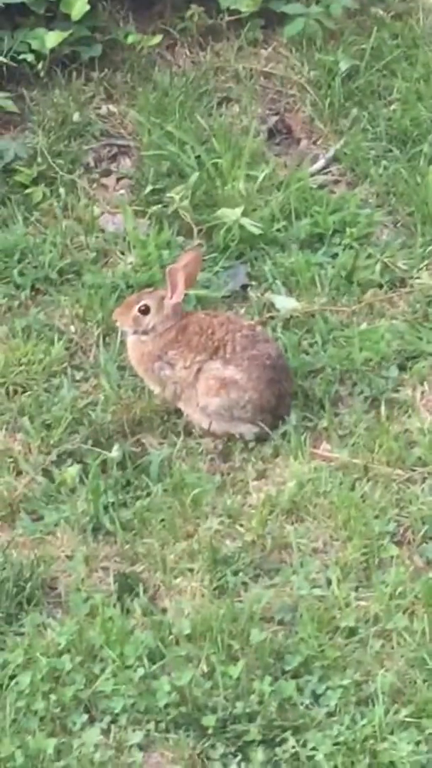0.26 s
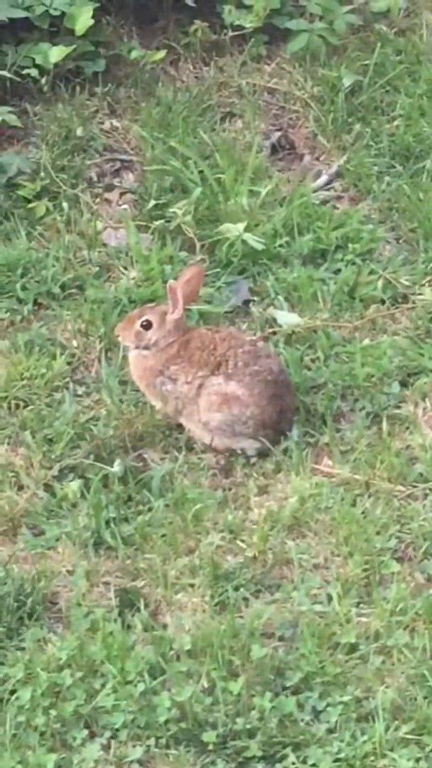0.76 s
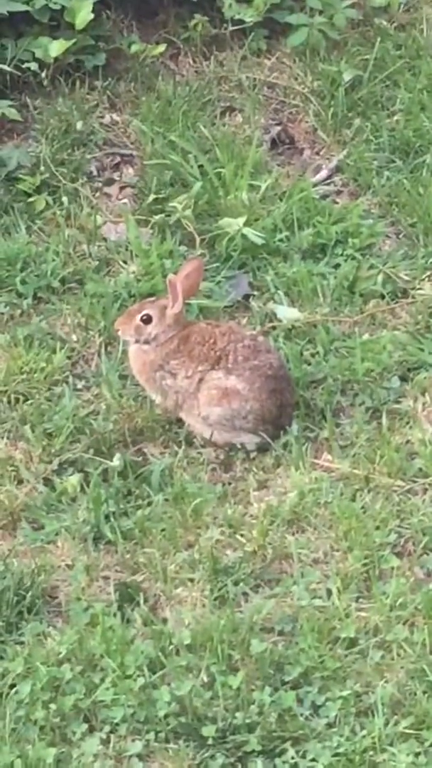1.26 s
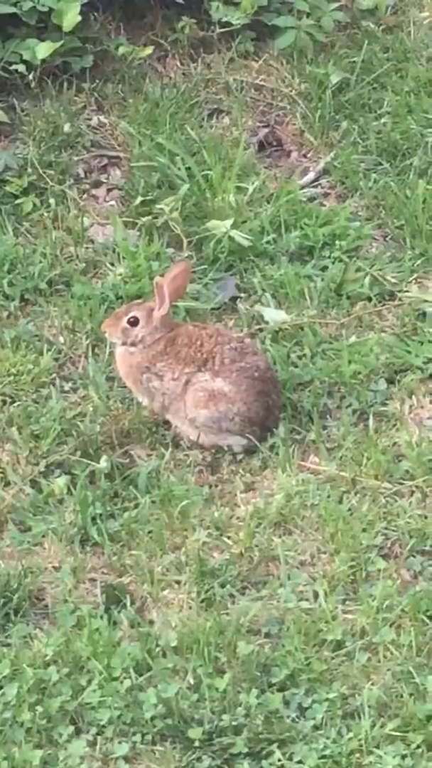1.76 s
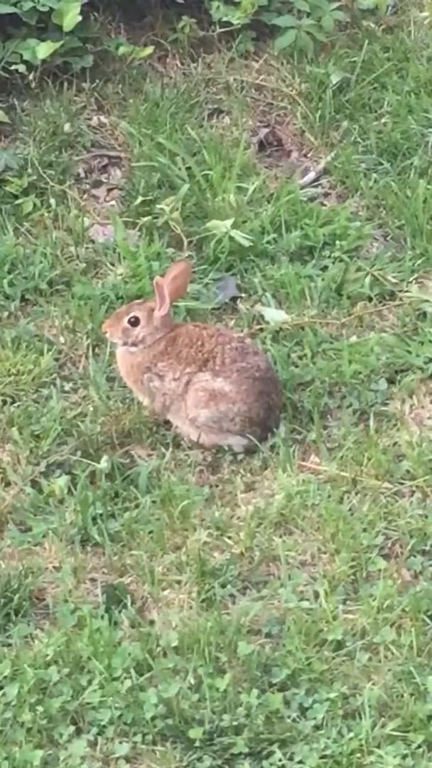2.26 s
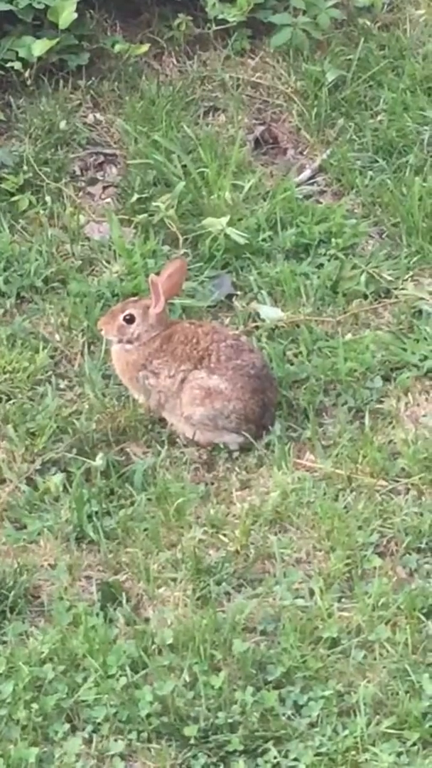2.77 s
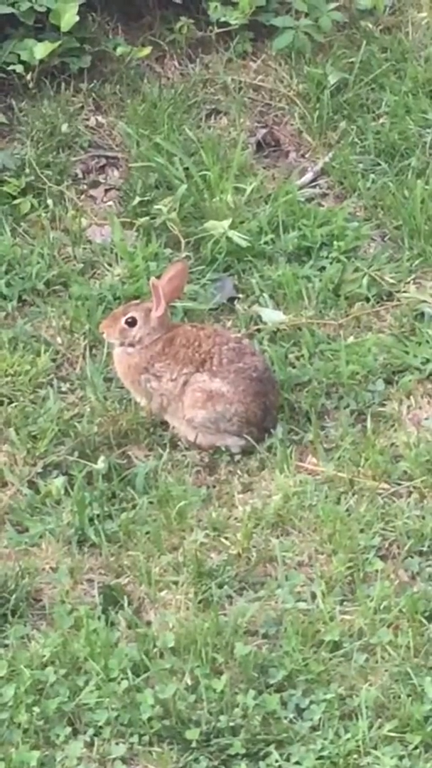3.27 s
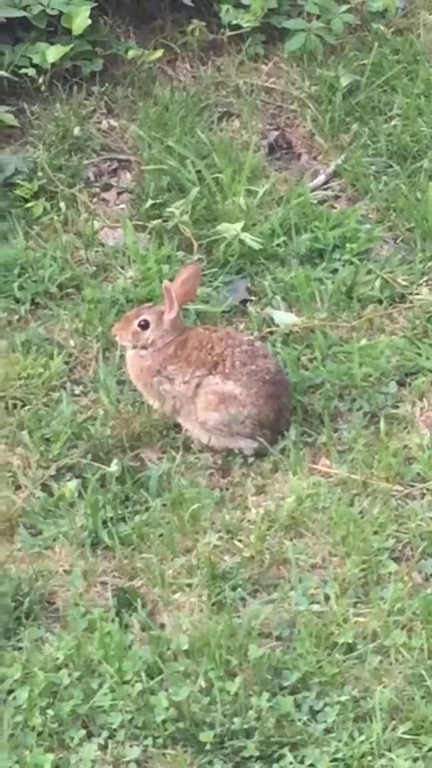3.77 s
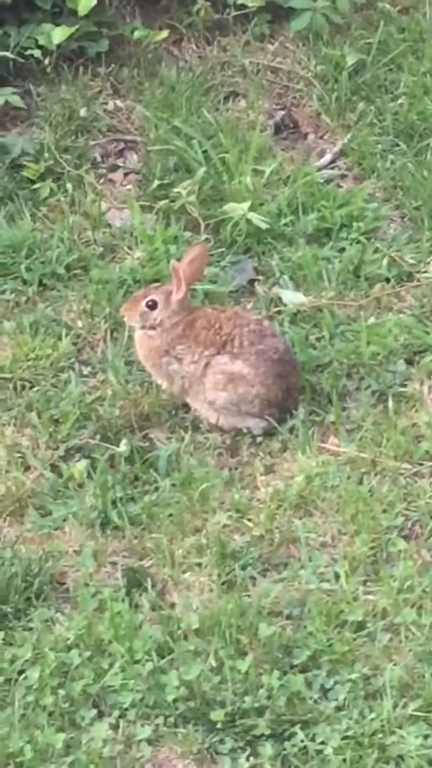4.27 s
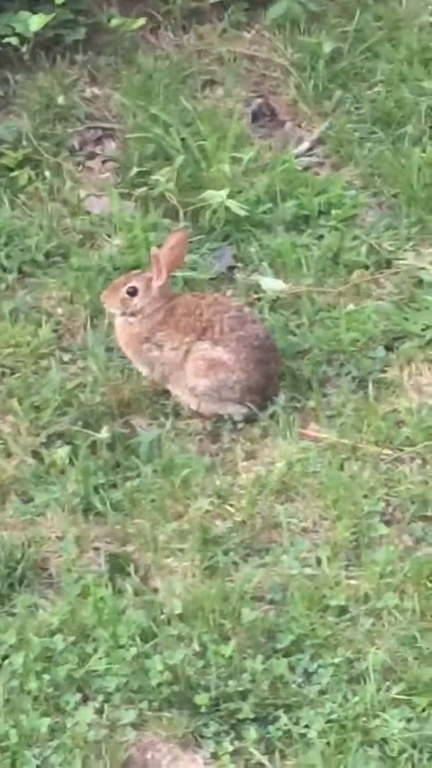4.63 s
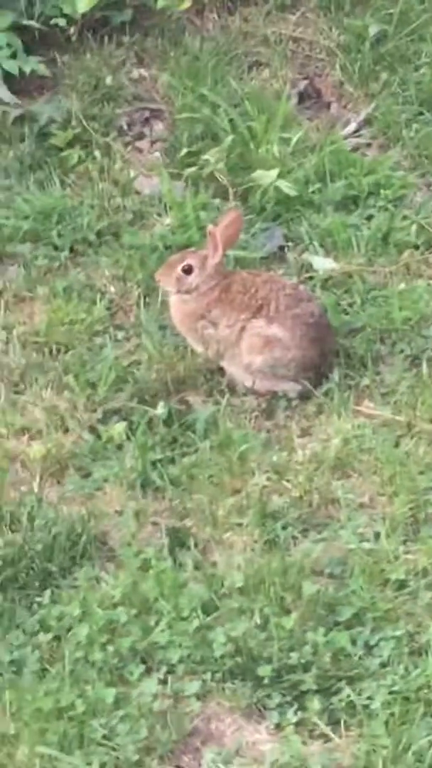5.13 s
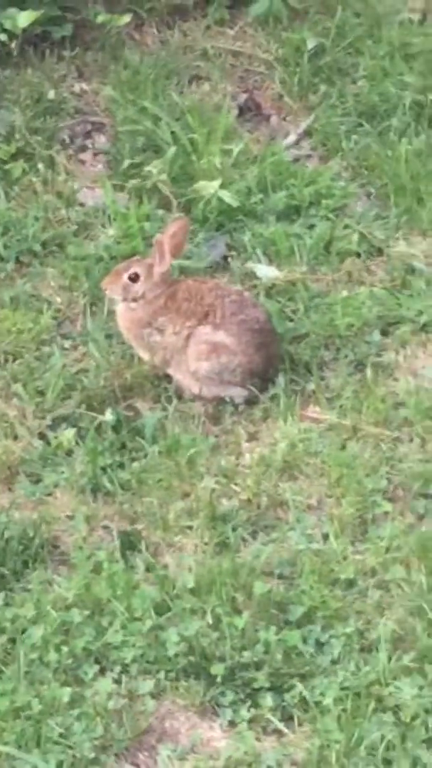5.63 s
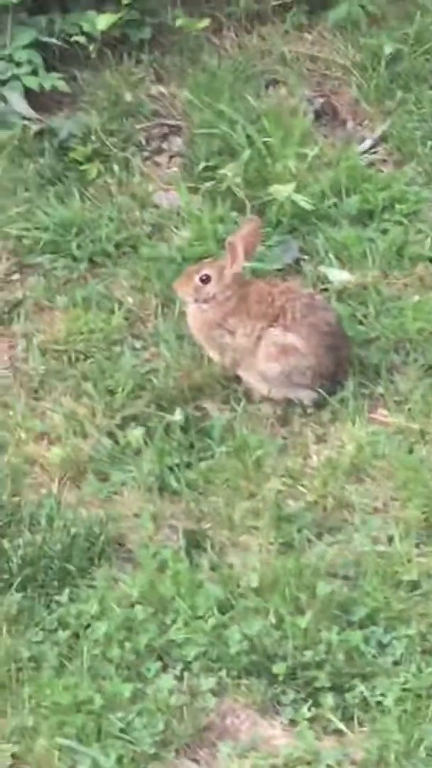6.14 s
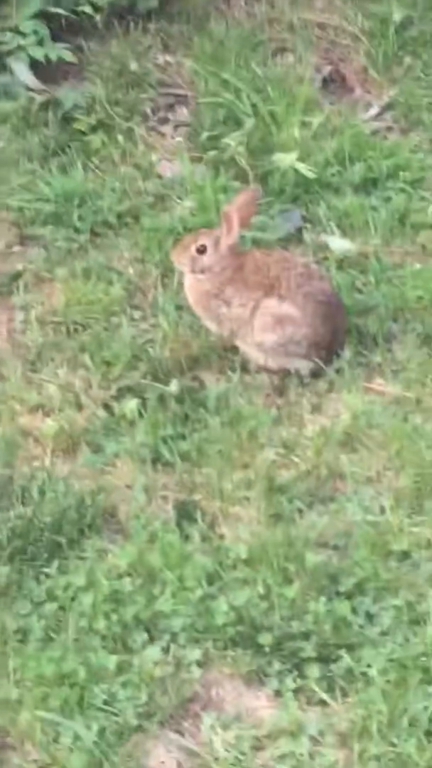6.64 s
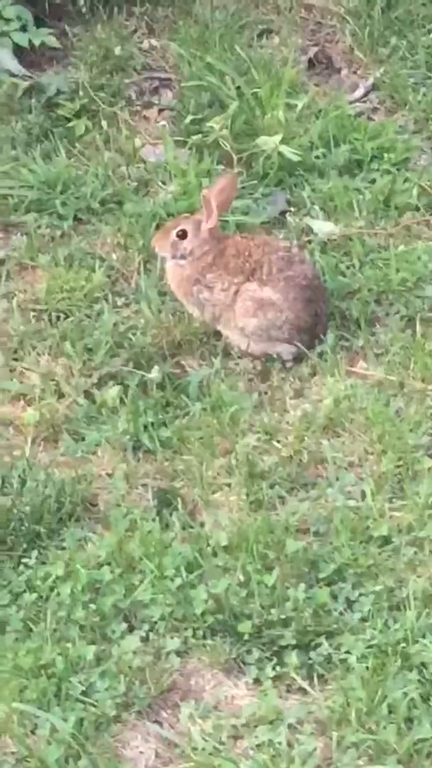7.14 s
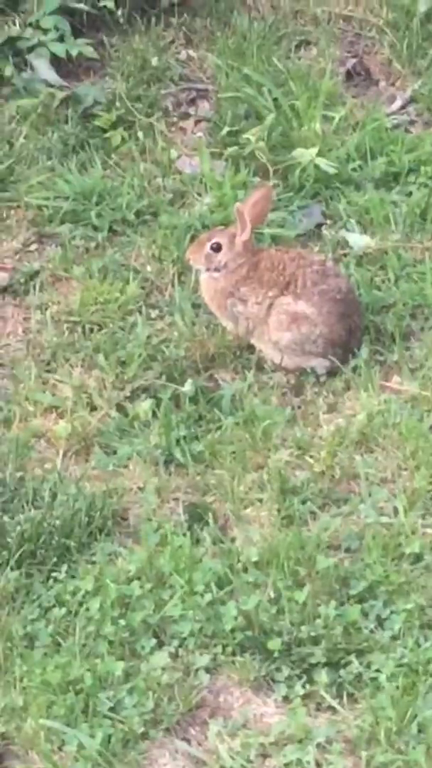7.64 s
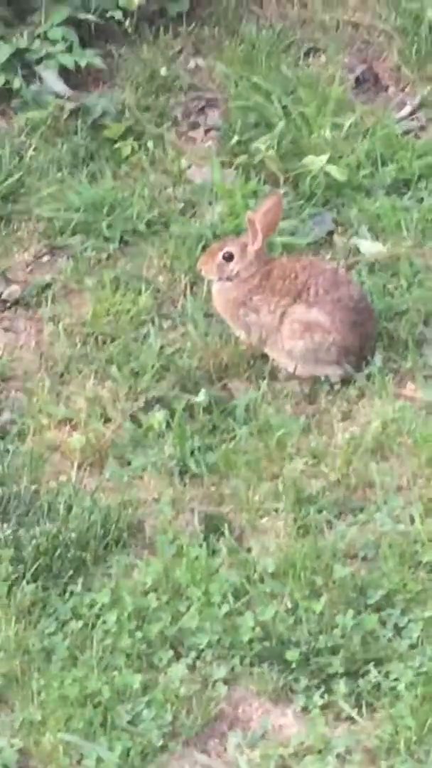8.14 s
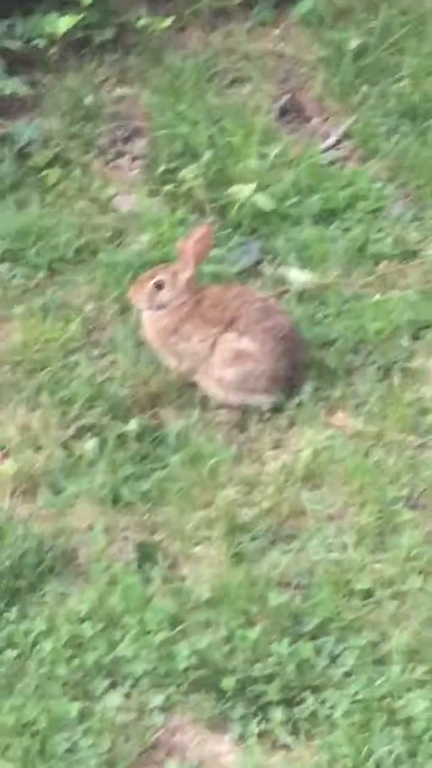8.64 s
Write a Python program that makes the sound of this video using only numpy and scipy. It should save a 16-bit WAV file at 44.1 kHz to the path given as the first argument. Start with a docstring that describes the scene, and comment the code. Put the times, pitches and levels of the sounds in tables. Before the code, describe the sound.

Outdoors on a summer lawn, cicadas buzz continuously, bright and finely rattling, with faint cricket notes beneath. Distant birds give thin, slightly hoarse falling whistles, crowded in the first three seconds, sparser, then busy again from about five to seven. A deep soft rumble sits underneath and sometimes drops suddenly. A few tiny rustles pass near the single microphone; the rabbit itself is silent.

```python
"""A lawn in summer, heard from one microphone among trees. Distant birds trade thin, falling cries: harmonics
of a sagging pitch, with a noise tail for the garden's echo. Cicadas buzz steadily: the nearest as rows of
falling chirps, those farther off as click-gated noise. Far crickets hold narrow notes of noise. A few soft
rustles pass close by. Filtered noise makes the low rumble, abruptly eased at times as if by a recorder's
wind suppression, the tyres of far traffic and the open air."""
import sys
import numpy as np
from scipy import signal
from scipy.fft import rfft, irfft, next_fast_len
from scipy.io import wavfile
from scipy.ndimage import uniform_filter1d

SR = 44100
rng = np.random.default_rng(int(sys.argv[2]) if len(sys.argv) > 2 else 0)


def output_pcm(signal):
    """Save a mono or channel-first signal as 16-bit PCM at the path in sys.argv[1].

    Samples are clipped to [-1, 1] before scaling.
    """
    pcm = np.clip(np.atleast_2d(signal).T, -1, 1) * 32767
    wavfile.write(sys.argv[1], SR, np.round(pcm).astype(np.int16))


N = 392490
TIME = np.arange(N) / SR

# distant bird cries, whistle level before flutter and garden: start_s, length_s, crest_hz, sag_hz_per_s,
# whistle_db, lower_partials_db (re whistle), hoarseness (0-1)
BIRD_CRIES = [ (.01, .13, 3370, 1000, -69.5, -22, 0.6), (0.121, 0.15, 3550, 600, -65.5, -12, .4),
              (.31, 0.27, 3420, 880, -60, -25, 0.3), (.45, .23, 3660, 1600, -53, -20, 0),
              (0.531, .34, 3433, 1192, -54, -24, 0.42), (0.932, 0.29, 3404, 1314, -59, -23, 0.3),
              (1.10, 0.37, 3614, 1600, -56.5, -23, 0.2), (1.309, 0.26, 3547, 1797, -54.5, -23, 0.3),
              (1.657, 0.083, 3440, 597, -60, -15, .4), (1.726, 0.23, 3400, 1850, -52, -24.5, 0.17),
              (1.974, 0.2, 3674, 247, -56.5, -21.5, .03), (2.121, 0.32, 3480, 1295, -51.5, -26, 0.18),
              (2.419, 0.23, 3374, 1275, -61, -19, 0.54), (2.566, 0.21, 3623, 1005, -58, -14, 0.36),
              (2.629, 0.22, 3260, 1000, -60.5, -21, 0.36), (2.949, 0.15, 3320, 2000, -61.5, -23, 0.17),
              (3.379, 0.26, 3540, 597, -68, -10, .2), (3.599, 0.13, 3460, 500, -59, -20, 0.43),
              (4.456, 0.16, 3420, 200, -67, -15, 0.34), (4.531, 0.19, 3365, 1890, -62, -27, 0.2),
              (4.873, .32, 3467, 1200, -55, -34, .18), (4.915, 0.35, 3260, 1200, -59, -19, 0.2),
              (5.249, 0.28, 3510, 588, -65, -18, 0.42), (5.637, 0.32, 3407, 1050, -54.5, -28, .17),
              (5.732, .20, 3590, 1490, -59, -20, 0), (5.938, .28, 3463, 1390, -54, -23, 0.47),
              (5.972, 0.216, 3605, 1604, -55.5, -11.5, 0.18), (6.186, .33, 3155, 648, -60, -27, 0.2),
              (6.519, 0.18, 3434, 1170, -62.5, -18, .8), (6.705, 0.29, 3280, 702, -60, -25, 0.4),
              (6.889, .22, 3090, 1700, -66, -25, .55), (7.008, 0.16, 3587, 1400, -60.5, -10.5, 0.47),
              (7.13, .19, 3406, 1420, -61, -31, .9), (7.986, 0.25, 3410, 1300, -69.5, -24, 0.27),
              (8.783, .32, 3420, 1100, -55.5, -30.5, 0.13), ]
# partials below the whistle: harmonic, level_db (re the cry's lower_partials_db)
LOWER_PARTIALS = [(2, -1), (3, 0.5)]
# faint partials above the whistle: harmonic, level_db (re whistle)
UPPER_PARTIALS = [(5, -24), (10, -26.5)]
# nearest cicadas: strokes_per_s, level_db, stroke_start_hz, stroke_end_hz
NEAR_CICADAS = [(46.18, -58, 7150, 6450), (56.66, -62.5, 7100, 6400)]
# cicadas farther off: clicks_per_s, level_db (within the far chorus), click_decay_s
FAR_CICADAS = [(50.3, -5.5, 0.0059), (172.5, -5.5, 0.0053), (121.2, -6, .003)]
# colour of their ringing abdomens: pitch_hz, relative_db_per_hz
CICADA_BODY = [(4000, -41), (4900, -24.5), (5600, -20), (6000, -12.5), (6250, -1), (6550, 2.5), (7030, 3),
               (7170, -2.5), (7500, -10), (7750, -18.5), (8200, -25.5), (9500, -33.5), (11000, -38)]
# steady notes of far crickets: pitch_hz, width_hz, start_level_db, swell_db_per_s
CRICKET_NOTES = [(4563, 25, -82, 0.55), (5390, 45, -79.5, -0.27), (5610, 60, -77.5, 0.16),
                 (5790, 45, -77, 0), (4170, 170, -81.5, -1)]
# soft rustles near the microphone: centre_s, half_length_s (to 1/e), level_db, centre_hz, width_octaves
RUSTLES = [(3.994, 0.058, -64.5, 1980, 0.86), (5.674, 0.032, -69.5, 13300, 0.86),
           (5.838, 0.044, -75, 13000, 0.53), (5.93, 0.44, -81, 11900, .7), (7.767, .03, -78, 12000, 0.83)]
# level of the low rumble, with its abrupt dips: time_s, level_db
RUMBLE_LEVEL = [(0, -48), (.65, -48.5), (.72, -58.5), (1.2, -53.5), (1.8, -49), (2.6, -50), (3.6, -49),
                (5.2, -47.5), (6.22, -47), (6.36, -52.5), (6.62, -46.5), (7.35, -49), (7.63, -50.5),
                (7.72, -59), (8.17, -53.5), (8.36, -48), (8.48, -54.5), (8.62, -46.5)]
# colour of the rumble: pitch_hz, relative_db_per_hz
RUMBLE_COLOUR = [(20, -46), (32, -23), (42, -13.5), (55, -2.5), (76, 1), (92, -1.5), (110, 0.5),
                 (140, -7.5), (200, -12), (300, -31.5), (500, -69)]
# tyres on a far road: time_s, whine_db, roar_db
TYRE_LEVELS = [(0, -90, -73.5), (1.3, -84, -71.5), (2.7, -83, -65.5), (3.3, -77, -70.5), (4, -88, -65.5),
               (5.8, -74.5, -73), (7.2, -70, -77.5), (7.8, -75.5, -71), (8.9, -80, -78)]
# colour of the tyre roar: pitch_hz, relative_db_per_hz
ROAR_COLOUR = [(120, -4), (260, 2.5), (420, -4), (620, -1), (900, -0.5), (1400, -30.5), (3000, -49)]
# colour of the open air: pitch_hz, relative_db_per_hz
AIR_COLOUR = [(100, 3.5), (280, 6), (450, -4), (630, 0), (1000, 1), (1350, -6), (1800, -9.5), (2200, -12),
              (3400, -17), (4400, -12), (7000, -17.5), (10000, -36), (13500, -24), (16000, -59)]

HOOK_S, HOOK_HZ = 0.052, 249.7  # each cry's rise to its crest: time taken, height
GARDEN_T60_S = 1
THROB_HZ, THROB_CREST_S, THROB_DB = 3.3, 0.2, 0.5  # far chorus: rate, time of a crest, depth either way
TYRE_HZ, TYRE_WIDTH_HZ = 1065, 40  # tread whine
CUTOFF_HZ = 15800


def from_db(db):
    """Decibels to gain."""
    return 10 ** (np.asarray(db) / 20)


def rms_one(x):
    """Scale to unit power."""
    return x / np.sqrt(np.mean(x ** 2) + 1e-20)


def filtered(x, gain_at):
    """Filter by a gain given as a function of frequency; rms 1."""
    size = next_fast_len(N)
    hz = np.maximum(np.arange(size // 2 + 1) * SR / size, 1)
    return rms_one(irfft(rfft(x, size) * gain_at(hz), size)[:N])


def coloured(x, spectrum):
    """Shape a sound by a table of (Hz, dB), interpolated along log frequency; rms 1."""
    points, db = np.transpose(spectrum)
    return filtered(x, lambda hz: from_db(np.interp(np.log(hz), np.log(points), db)))


def white():
    """Fresh white noise."""
    return rng.standard_normal(N)


def drift(rate_hz):
    """Random wandering of rms 1, its gain halved at rate_hz."""
    return filtered(white(), lambda hz: 1 / (1 + (hz / rate_hz) ** 2))


def narrow(centre_hz, width_hz):
    """Noise in one resonance, its gain halved width_hz from the centre; rms 1."""
    return filtered(white(), lambda hz: 1 / (1 + ((hz - centre_hz) / width_hz) ** 2))


def birds(quaver=0.0041, flutter_db=2.5, attack_s=0.042, release_s=0.038, hoarse_width_hz=190,
          rasp_db=-25, rasp_hz=3760, rasp_width_hz=1200):
    """Each cry hooks up to a crest and sags at a steady rate; the throat favours the fourth harmonic."""
    out = np.zeros(N)
    wobble = 1 + quaver * drift(69.0)
    flutter = flutter_db * drift(27)
    # an unsteady membrane spreads every partial into a hoarse band
    unsteady = drift(hoarse_width_hz) + 1j * drift(hoarse_width_hz)
    rasp = from_db(rasp_db) * narrow(rasp_hz, rasp_width_hz)
    for start, length, crest_hz, sag, whistle_db, lower_db, hoarse in BIRD_CRIES:
        span = (TIME > start) & (TIME < start + length)
        t = TIME[span] - start
        hook = HOOK_HZ * np.maximum(1 - t / HOOK_S, 0) ** 2
        whistle_hz = crest_hz - hook - sag * np.maximum(t - HOOK_S, 0)
        phase = 2 * np.pi * np.cumsum(whistle_hz / 4 * wobble[span]) / SR  # of the fundamental
        lower = [(k, db + lower_db) for k, db in LOWER_PARTIALS]
        partials = lower + [(4, 0)] + UPPER_PARTIALS
        tone = sum(from_db(db) * np.exp(1j * k * phase) for k, db in partials)
        # the divisor keeps hoarse and clear cries equally strong
        voice = (tone * (1 + hoarse * unsteady[span])).real / np.sqrt(1 + 2 * hoarse ** 2)
        swell = np.minimum(t / attack_s, 1) * np.minimum((length - t) / release_s, 1)
        out[span] += from_db(whistle_db + flutter[span]) * swell * (voice + rasp[span])
    return out


def garden(x, direct_db=1.5, echo_db=-0.5, build_s=0.023):
    """Trunks, leaves and walls scatter a cry into a diffuse tail."""
    t = TIME[:2 * SR]
    decay = from_db(-60 * t / GARDEN_T60_S)
    tail = rng.standard_normal(len(t)) * decay * (1 - np.exp(-t / build_s))
    echoes = signal.fftconvolve(x, tail / np.linalg.norm(tail))[:N]
    return from_db(direct_db) * x + from_db(echo_db) * echoes


def near_cicadas(waver=0.011, stroke_fade_db=9, blur=0.83, blur_hz=170):
    """Tymbal ribs buckle in turn, each ringing lower, so every stroke is a tiny falling chirp."""
    out = np.zeros(N)
    for rate, level_db, first_hz, last_hz in NEAR_CICADAS:
        stroke = np.cumsum(rate * (1 + waver * drift(2))) / SR % 1  # 0-1 through each stroke
        phase = 2 * np.pi * np.cumsum(first_hz + (last_hz - first_hz) * stroke) / SR
        scatter = 1 + blur * (drift(blur_hz) + 1j * drift(blur_hz))
        swell = np.sqrt(np.abs(np.sin(np.pi * stroke))) * from_db(-stroke_fade_db * stroke)
        out += from_db(level_db) * rms_one(swell * (scatter * np.exp(1j * phase)).real)
    return out


def far_cicadas(level_db=-53.5, hiss_db=-1, waver=0.014):
    """Each tymbal buckles in a train of short bursts; countless singers merge into a throbbing hiss."""
    chorus = from_db(hiss_db) * white()
    for rate, db, decay_s in FAR_CICADAS:
        since_click_s = np.cumsum(rate * (1 + waver * drift(2))) / SR % 1 / rate
        chorus += from_db(db) * rms_one(white() * np.exp(-since_click_s / decay_s))
    throb_db = THROB_DB * np.cos(2 * np.pi * THROB_HZ * (TIME - THROB_CREST_S))
    return from_db(level_db + throb_db) * coloured(chorus, CICADA_BODY)


def crickets(waver_db=3.0):
    """Many far wing strokes blur into narrow, wavering notes that slowly swell, fade or hold."""
    out = np.zeros(N)
    for note_hz, width_hz, start_db, swell in CRICKET_NOTES:
        level_db = start_db + swell * TIME + waver_db * drift(9.9)
        out += from_db(level_db) * narrow(note_hz, width_hz)
    return out


def rustles(grain_db=3.5):
    """Brief grainy swishes of light rubbing, close by."""
    out = np.zeros(N)
    grain = grain_db * drift(120)
    for centre_s, half_s, level_db, centre_hz, octaves in RUSTLES:
        hiss = filtered(white(), lambda hz: 1 / (1 + (np.log2(hz / centre_hz) / octaves) ** 2))
        swell = np.exp(-((TIME - centre_s) / half_s) ** 2)
        out += from_db(level_db + grain) * swell * hiss
    return out


def low_rumble():
    """A low rumble, evened out over a sixth of a second, that swells gently and at times eases abruptly,
    as if by a recorder's wind suppression."""
    rumble = coloured(white(), RUMBLE_COLOUR)
    rumble = rms_one(rumble / np.sqrt(uniform_filter1d(rumble ** 2, size=SR // 6)))
    return from_db(np.interp(TIME, *np.transpose(RUMBLE_LEVEL))) * rumble


def tyres():
    """Far wheels give a dull roar and a faint whine from their tread."""
    time_s, whine_db, roar_db = np.transpose(TYRE_LEVELS)
    whine = from_db(np.interp(TIME, time_s, whine_db)) * narrow(TYRE_HZ, TYRE_WIDTH_HZ)
    roar = from_db(np.interp(TIME, time_s, roar_db)) * coloured(white(), ROAR_COLOUR)
    return whine + roar


def air(level_db=-63.0, patchy_db=3.0):
    """The wash of the neighbourhood, each band of noise flickering on its own."""
    bands = np.zeros(N)
    for hz in np.geomspace(200, 15000, 20):
        flicker = from_db(patchy_db * drift(14.4))
        bands += flicker * narrow(hz, hz / 6) * np.sqrt(hz)  # wider bands need more power
    return from_db(level_db) * coloured(bands, AIR_COLOUR)


def scene():
    """All sources at one microphone."""
    insects = near_cicadas() + far_cicadas() + crickets()
    background = low_rumble() + tyres() + air()
    return (garden(birds()) + insects + rustles() + background)[None]


def record(dry):
    """The top is cut steeply by an elliptic low-pass."""
    lowpass = signal.ellip(10, 0.1, 70, CUTOFF_HZ, fs=SR, output="sos")
    return signal.sosfilt(lowpass, dry)


dry = scene()
out = record(dry)
output_pcm(out)
```